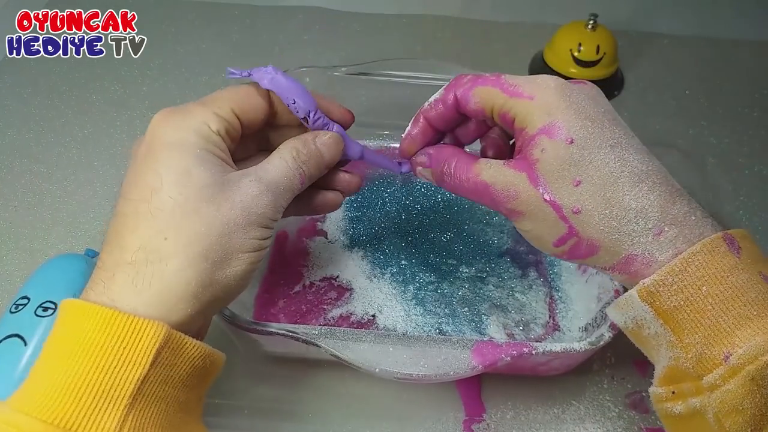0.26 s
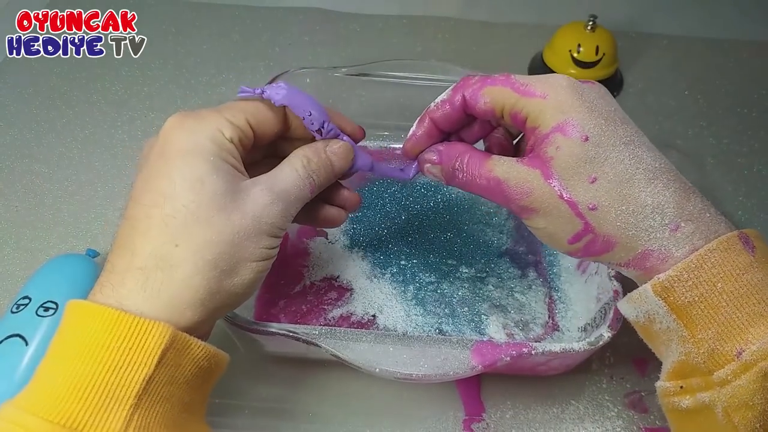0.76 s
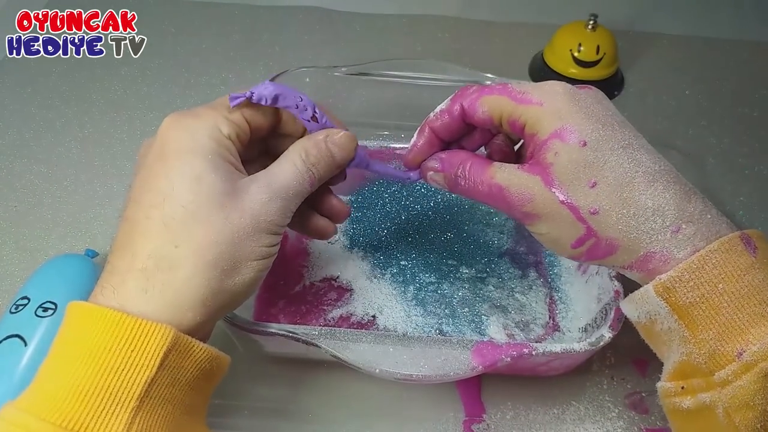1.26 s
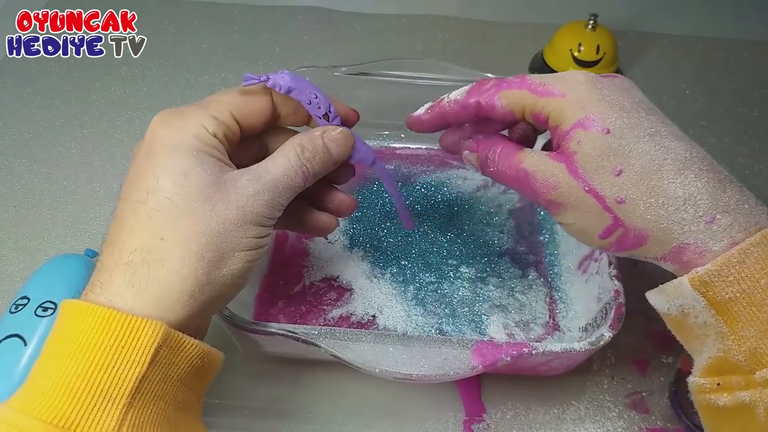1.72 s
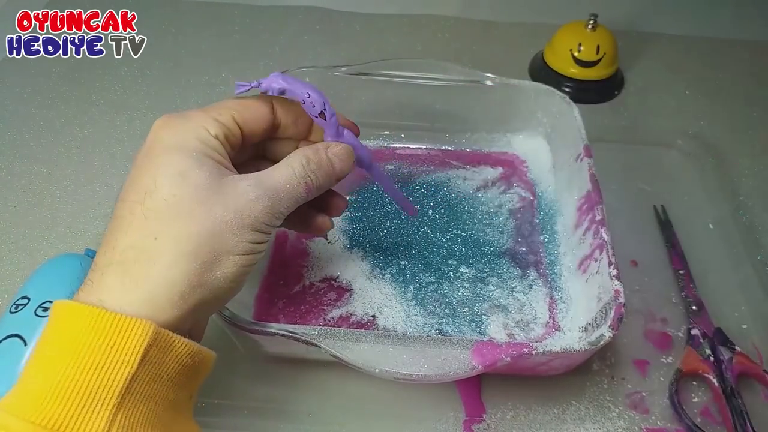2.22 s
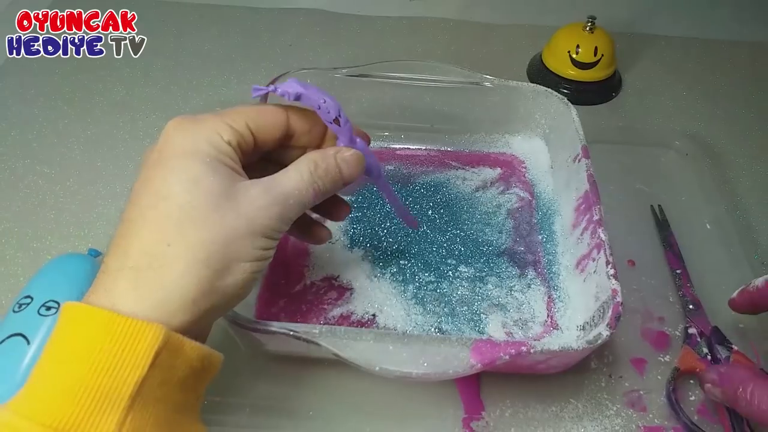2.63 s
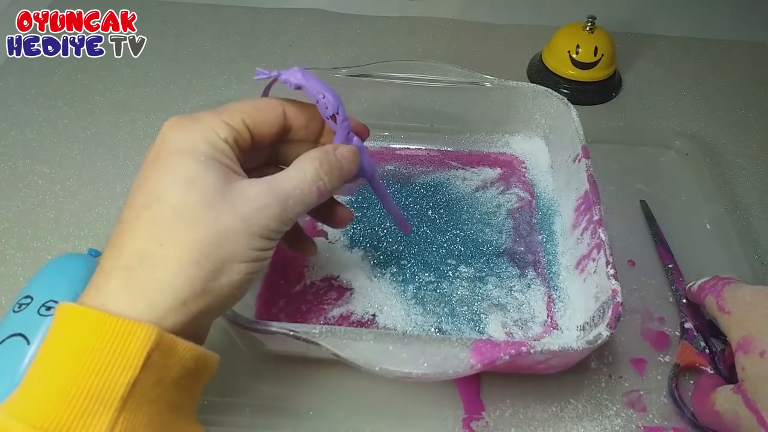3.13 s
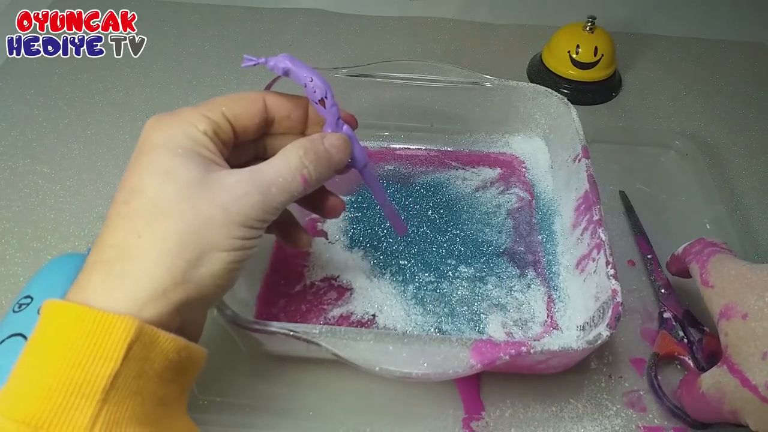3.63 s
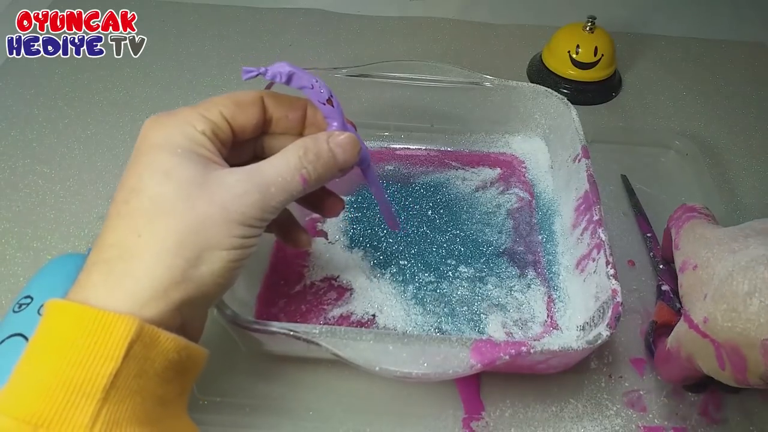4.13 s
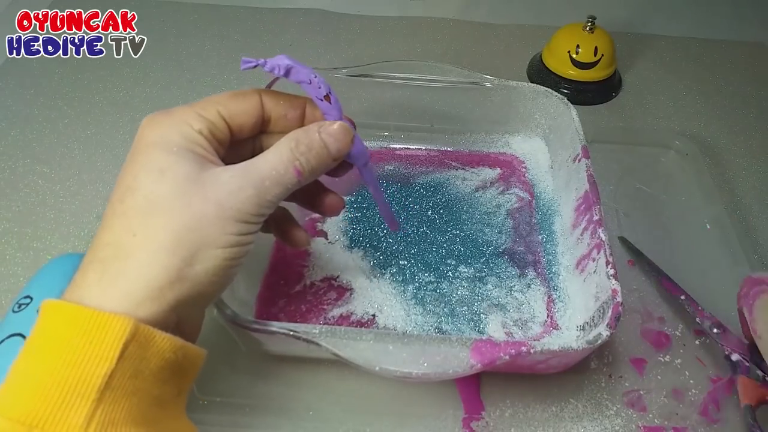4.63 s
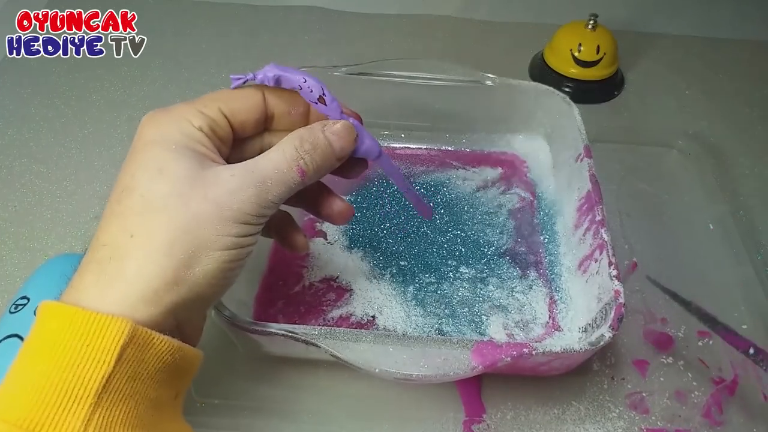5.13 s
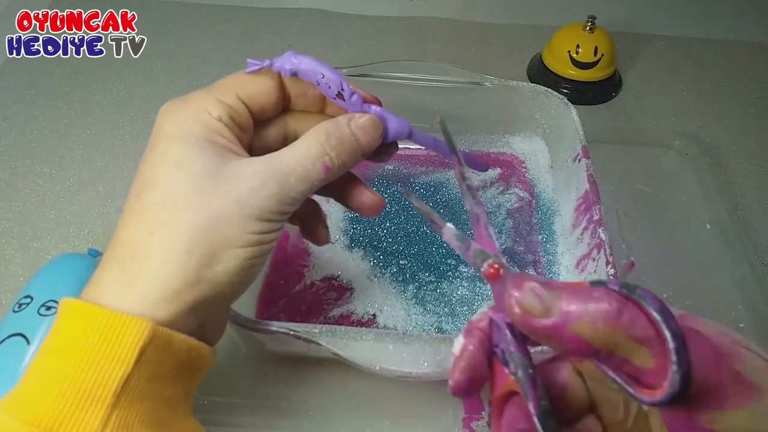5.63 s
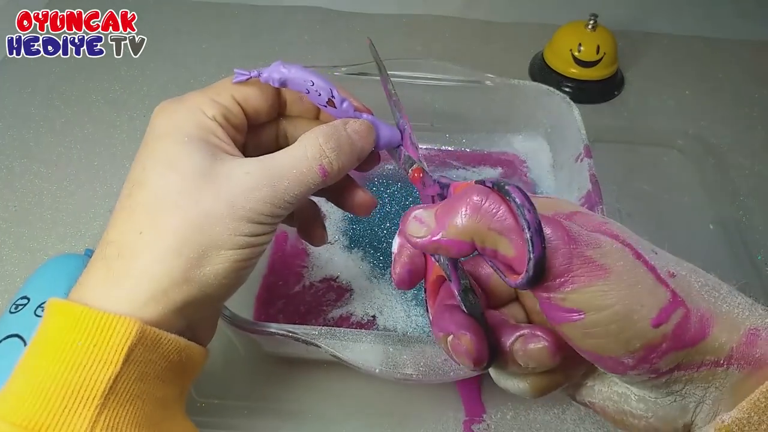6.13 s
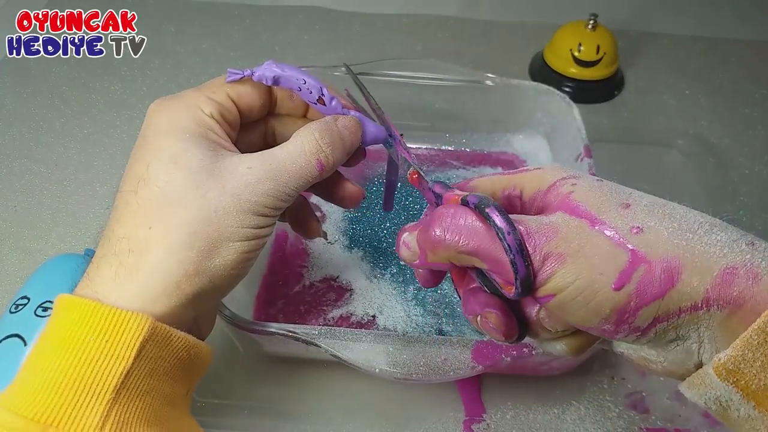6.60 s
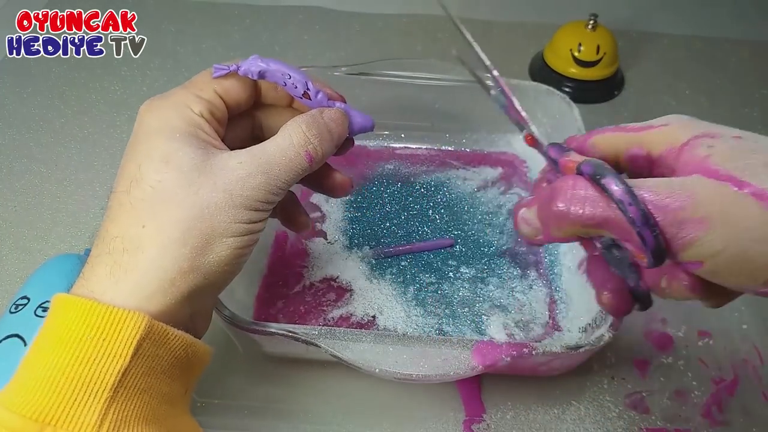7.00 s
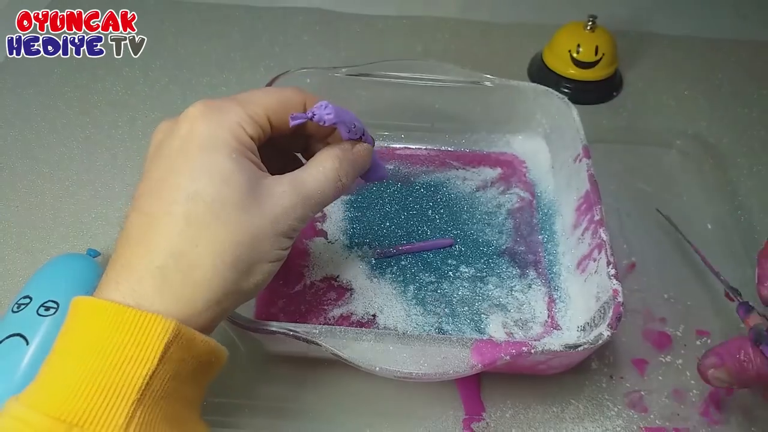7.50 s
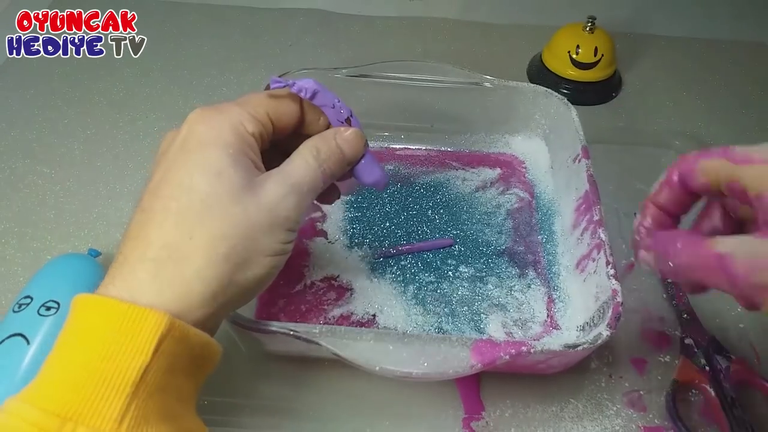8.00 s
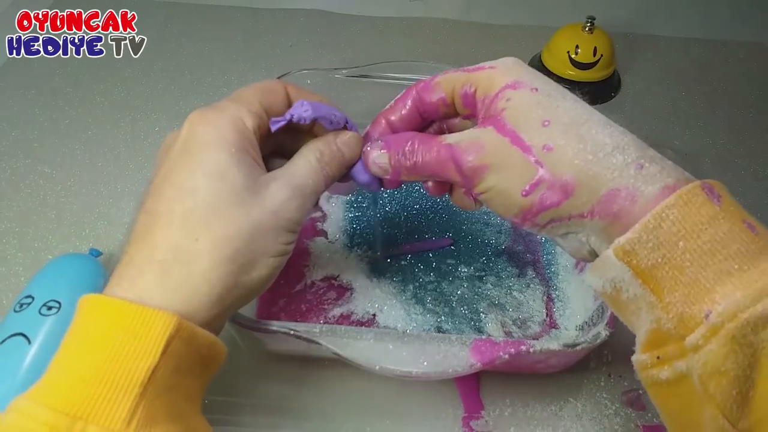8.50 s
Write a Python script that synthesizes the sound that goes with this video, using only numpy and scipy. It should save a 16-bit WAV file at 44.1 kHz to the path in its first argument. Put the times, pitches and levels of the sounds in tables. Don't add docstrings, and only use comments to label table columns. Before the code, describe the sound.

Soft rubbery strokes come first, followed by a pause and tentative woody tapping as a hand fumbles for scissors. A strong double knock marks the lift, bright steel ticks and a thin gritty snip mark the cut. After a short lull the scissors land on the table with three loud hollow clacks and small rattles. Quiet rubbing ends it. Close microphone, small room, faint steady hiss.

```python
import sys
import numpy as np
from scipy import signal
from scipy.fft import rfft, irfft
from scipy.io import wavfile

SR = 44100
rng = np.random.default_rng(int(sys.argv[2]) if len(sys.argv) > 2 else 0)


def wav_out(sig):
    wavfile.write(sys.argv[1], SR, np.round(np.clip(np.atleast_2d(sig).T, -1, 1) * 32767).astype(np.int16))


def natural_amplitude(level_db):
    exponent = np.asarray(level_db, float) / 20
    return 10 ** exponent


N = 385875

# frequency [Hz], density [dB per Hz].
SHEAR_COLOUR = [(1880, -83.5), (3200, -13), (3540, -5.5), (4570, -3), (5300, -1.5), (5750, -5.5),
                (6900, -6.5), (7780, -1.5), (8050, -3.5), (8440, -13), (9300, -12.5), (11300, -3.5),
                (16000, -8)]
# frequency [Hz], level [dB], t60 [s].
TABLE_MODES = [(75.16, -8, 0.25), (101, -2.5, 0.26), (116, 3.5, 0.3), (128, -9.5, 0.15), (216, 2, 0.092),
               (321, -1.5, 0.14), (356.5, 4.5, 0.073), (397, -6.5, 0.24), (430, -6.5, 0.021),
               (540, -9.5, 0.044), (720, 2.5, 0.014)]


def rms_one(x):
    return x / np.sqrt(np.mean(x ** 2) + 1e-20)


def butter(x, order, hz, kind="low"):
    return signal.sosfilt(signal.butter(order, hz, kind, fs=SR, output="sos"), x)


def impulse(spectrum, size=2048):
    table_hz, table_db = np.transpose(spectrum)
    hz = np.maximum(np.fft.rfftfreq(size, 1 / SR), 1)
    db = np.maximum(np.interp(np.log(hz), np.log(table_hz), table_db), -70)
    cepstrum = irfft(db * np.log(10) / 20)
    cepstrum[1:size // 2] *= 2
    cepstrum[size // 2 + 1:] = 0
    h = irfft(np.exp(rfft(cepstrum)))
    return h / np.sqrt(np.sum(h ** 2))


def ring(x, hz, t60_s):
    radius = natural_amplitude(-60 / (t60_s * SR))
    w = 2 * np.pi * hz / SR
    return signal.lfilter([0, np.sin(w)], [1, -2 * radius * np.cos(w), radius ** 2], x + 1e-18)


def friction(spectrum, per_s, spread_db, grain_db):
    height = natural_amplitude(spread_db * np.minimum(rng.exponential(1, N), 5))
    slips = height * rng.choice([-1, 1], N) * (rng.random(N) < per_s / SR)
    rough = rng.standard_normal(N) + natural_amplitude(grain_db) * rms_one(slips)
    return rms_one(signal.fftconvolve(rough, impulse(spectrum, size=8192))[:N])


def swells(rows, roundness, lifted=False):
    out = np.zeros(N)
    for s, db, rise_s, fall_s, *lift_db in rows:
        first = max(round((s - 3 * rise_s) * SR), 0)
        last = min(round((s + 3 * fall_s) * SR), N)
        i = np.arange(first, last)
        away = np.maximum((s - i / SR) / rise_s, (i / SR - s) / fall_s)
        peak_db = db + (lift_db[0] if lifted else 0)
        out[i] += natural_amplitude(peak_db - 20 * away ** roundness)
    return out


def puffs(rows, cycles, ring_s):
    size = 12000
    out, age_s = np.zeros(N), np.arange(size) / SR
    for s, db, hz, attack_s, t60_s in rows:
        noise = rng.standard_normal(size)
        burst = noise * np.minimum(age_s / attack_s, 1) * natural_amplitude(-60 * age_s / t60_s)
        puff = ring(burst, hz, ring_s + cycles / hz)
        out[round(s * SR):][:size] += natural_amplitude(db) * puff / np.abs(puff).max()
    return out


def table_top(push):
    out = 0
    for k, (hz, db, t60_s) in enumerate(TABLE_MODES):
        out = out + natural_amplitude(db) * (-1) ** k * ring(push[k], hz, t60_s)
    return butter(out, 2, 900)


def hiss():
    # frequency [Hz], density [dB per Hz].
    rumble_colour = [(15, -27.5), (25, -2.5), (104, 2.5), (201, -4), (250, -11), (359, -9), (629, -14.5),
                     (1580, -15.5), (1850, -14), (3000, -17), (3900, -43), (6600, -120)]
    preamp_colour = [(1760, -36.5), (3000, -11.5), (4120, -6), (4580, -16.5), (4680, -6.5), (5130, -2),
                     (5430, -6.5), (5740, -12), (7350, -10), (8290, -20.5), (11100, -19.5), (13100, -7),
                     (16200, -11.5)]
    # centre [Hz], width [Hz], level [dB].
    raised = [(1620, 130, -86.5), (2286, 72, -85.5), (12800, 86, -96.5), (13200, 220, -87)]
    bands = 0
    for hz, width_hz, db in raised:
        bands = bands + natural_amplitude(db) * rms_one(ring(rng.standard_normal(N), hz, 4.0 / width_hz))
    rumble = natural_amplitude(-72.5) * friction(rumble_colour, per_s=10, spread_db=1.5, grain_db=-40)
    preamp = natural_amplitude(-69) * friction(preamp_colour, per_s=8.9, spread_db=11.5, grain_db=-51.0)
    return rumble + preamp + bands


def strokes():
    # middle [s], level [dB], rise [s], fall [s].
    slides = [
        (0.0, -76, .05, 0.076),
        (.194, -67, 0.18, 0.12),
        (.47, -60.5, 0.2, 0.2),
        (.81, -59.5, 0.13, 0.15),
        (1.11, -58, 0.14, 0.15),
        (1.4, -60, 0.11, 0.094),
        (1.59, -64, 0.11, 0.17),
        (8.56, -63.5, 1, 0.12),
        (8.74, -64.5, 0.052, 0.084),
    ]
    # frequency [Hz], density [dB per Hz].
    rubber_colour = [(880, -36.5), (1500, -62), (1940, -23), (2270, -17.5), (2460, -11.5), (3120, -49.5),
                     (3350, -10), (4460, -3), (5600, -4), (8000, -2.5), (9280, -15), (12000, -5),
                     (16000, -7)]
    # frequency [Hz], t60 [s], level [dB].
    skin_modes = [(4600, 0.0041, -13), (6640, 0.02, -20), (8100, 0.03, -18)]
    slide = friction(rubber_colour, per_s=1500, spread_db=-1.0, grain_db=0.0)
    skin = sum(natural_amplitude(db) * rms_one(ring(slide, hz, t60_s)) for hz, t60_s, db in skin_modes)
    return swells(slides, roundness=2.08) * rms_one(slide + skin)


def ticks():
    # start [s], peak [dB], colour [Hz].
    snaps = [(0.1994, -52, 5370), (1.562, -58, 4480), (1.579, -42.5, 7900), (5.218, -50, 4910),
             (5.327, -44, 5000), (4.6, -43, 14000), (5.3532, -36, 5060), (5.3842, -40, 14600),
             (5.409, -36, 14100), (6.325, -51, 9800), (5.436, -29.5, 11900), (5.451, -36, 11150),
             (5.468, -47, 11630), (5.474, -33, 6700), (6.2991, -50, 9460), (6.276, -48, 11430),
             (6.343, -50, 4500), (6.632, -50, 4480), (6.654, -46.5, 12800), (6.6595, -42, 5500),
             (6.663, -36.5, 7500), (6.679, -41, 7800), (6.764, -49.5, 4520), (6.308, -49, 7040),
             (6.857, -41, 14400), (6.86, -45.5, 15100), (6.371, -44, 9500), (6.883, -48, 12800),
             (7.2715, -46, 13050), (7.284, -52, 13500), (7.2898, -35, 13500), (7.2947, -37, 12670),
             (7.3, -46, 13840), (7.306, -34, 15230), (7.311, -41, 14050), (7.314, -38, 7660),
             (7.57, -22.5, 15100), (7.59, -29.5, 15000), (7.81, -48, 8000), (7.9413, -18, 7800),
             (7.966, -31, 8000), (6.362, -38, 10970), (3.397, -41, 3500)]
    size, steel = 512, impulse(SHEAR_COLOUR)
    out, age_s = np.zeros(N), np.arange(size) / SR
    for s, db, hz in snaps:
        burst = rng.standard_normal(size) * natural_amplitude(-60 * age_s / .008)
        broad = signal.fftconvolve(burst, steel)[:size]
        snap = broad + natural_amplitude(-7.5) * ring(burst, hz, .002)
        out[round(s * SR):][:size] += natural_amplitude(db - 3.5) * snap / np.abs(snap).max()
    return butter(out, 2, 1800, "high")


def catches():
    # start [s], peak [dB], frequency [Hz], attack [s], t60 [s].
    rows = [(2.729, -52, 1200, 0.0018, 0.058), (2.74, -52, 2180, 0.0073, 0.12),
            (3.085, -47.5, 1160, .006, 0.051), (3.165, -49.5, 1060, .03, 0.066),
            (2.928, -47, 1039, 0.015, 0.091), (2.948, -41.5, 1010, .005, 0.041),
            (1.58, -57, 4470, 0.009, 0.055), (4.653, -41, 5400, .002, 0.023),
            (4.695, -50, 1600, 0.0023, 0.073), (6.269, -57, 11500, 0.0018, 0.018),
            (6.298, -49.5, 11360, .003, .02), (6.306, -50, 11230, .002, .04),
            (6.323, -52.5, 11470, 0.0019, .02), (6.358, -50.5, 5050, .003, 0.039),
            (6.37, -50, 11700, 0.0034, 0.078), (6.416, -53.5, 11600, 0.006, 0.052),
            (6.416, -55, 12800, .008, .07), (6.636, -53, 5000, .005, 0.032),
            (7.29, -49.5, 3760, 0.0035, 0.077)]
    return puffs(rows, cycles=11.0, ring_s=0.0068)


def drags():
    # peak [s], level [dB], rise [s], fall [s], grit re level [dB].
    rows = [(2.66, -67.5, 0.16, 0.2, -18), (2.85, -80.5, 0.36, 0.35, 15), (3.1, -65.5, 0.18, 0.29, 1),
            (3.42, -86.5, .2, 0.41, 22), (3.57, -63, 0.11, 0.037, -21), (4.02, -83, .15, 0.092, 20.5),
            (4.38, -72.5, 0.18, 0.14, 12), (4.5, -60, 0.11, 0.037, -1), (4.57, -69.5, 0.064, 0.22, 15),
            (4.85, -61.5, .12, .25, -4), (5.1, -62.5, 0.15, 0.21, -0.5), (7.63, -52.5, .06, 0.19, -5.5),
            (7.83, -43.5, 0.069, 0.066, -14), (7.95, -59.5, 0.092, 0.33, -2.5)]
    # frequency [Hz], density [dB per Hz].
    wood_colour = [(120, -32.5), (200, -6), (424, -22.5), (700, -10), (1130, -1), (1380, -8.5),
                   (1710, -4.5), (2710, -17.5), (4000, -12), (5200, -47.5), (8800, -120)]
    grit_colour = [(1180, -49.5), (2000, -7.5), (2220, -1), (2440, -9.5), (3230, -9), (4570, -0.5),
                   (7440, -8), (9830, -23), (13000, -20), (16000, -11)]
    wood = friction(wood_colour, per_s=2400, spread_db=2.5, grain_db=4.0) * natural_amplitude(-5.0)
    grit = friction(grit_colour, per_s=1500, spread_db=2.5, grain_db=-8) * natural_amplitude(-4)
    return swells(rows, roundness=2.0) * wood + swells(rows, roundness=1.6, lifted=True) * grit


def presses():
    # start [s], level [dB], lean to the deep modes [dB per octave].
    rows = [(2.597, -80, 7.5), (2.921, -66, 0), (2.964, -84, 8), (3.033, -69, 4.5), (3.192, -66, 4),
            (3.662, -64, -6.5), (4.022, -71, 0), (4.422, -63.5, 5), (4.466, -58.5, -0.4), (4.585, -69, 1.5),
            (4.784, -65, 0.9), (4.871, -57.5, -0.6), (4.942, -58, -0.7), (4.971, -44, 2.8),
            (4.986, -41.5, 0.7), (5.001, -40.5, 1.5), (7.57, -51, 0), (7.59, -52.5, -1.5),
            (7.648, -63, 5.5), (7.81, -55.5, -4), (7.94, -47, 0.5), (7.95, -58, 4), (7.964, -45, -2)]
    push = np.zeros((len(TABLE_MODES), N))
    octaves_down = np.log2(300 / np.array(TABLE_MODES)[:, 0])
    for s, db, lean_db in rows:
        uneven_db = 6.2 * rng.standard_normal(len(TABLE_MODES))
        push[:, round(s * SR)] += natural_amplitude(db + lean_db * octaves_down + uneven_db)
    return butter(table_top(push), 6, 66, "high")


def knocks():
    # start [s], peak [dB], ring [Hz], hardness [dB].
    gropes = [(2.598, -36.5, 1010, -14.5), (2.708, -50, 1159, -19), (2.729, -28.5, 2580, -29.5),
              (2.922, -38, 1140, -33), (2.938, -39, 1050, -38), (2.952, -41, 970, -36),
              (2.966, -25, 1085, -45), (2.977, -40, 746, -16), (3.035, -35.5, 850, -31),
              (3.194, -41, 1210, -10), (3.202, -27, 2700, -17), (3.394, -65, 1190, -7),
              (3.519, -52.5, 1300, 0), (3.608, -45, 1100, -23), (3.643, -43, 1070, -15),
              (3.663, -28, 1105, -62), (3.686, -44.5, 790, -9), (3.934, -44.5, 1130, -20),
              (3.957, -41, 1040, -48), (4.022, -28, 1080, -46), (4.106, -49.5, 1050, -21)]
    # start [s], peak [dB], ring [Hz], hardness [dB], extra rattle [dB].
    lift = [(4.376, -49, 1090, -9, 2), (4.423, -27, 1080, -33, 11), (4.463, -34, 955, -29, 8),
            (4.471, -35, 1000, -34, 9), (4.478, -36, 790, -32, -6), (4.481, -35, 890, -26, 6.5),
            (4.492, -41.5, 790, -45, 0), (4.586, -29.5, 1620, -14.5, -6.5), (4.599, -41, 1060, -2, -0.5),
            (4.694, -42.5, 1660, -21.5, -2.2), (4.783, -38.5, 1030, -27.5, 1.2),
            (4.87, -22, 1080, -13.5, -0.5), (4.874, -14, 1150, -24, 3), (4.93, -30, 1050, -28.5, 0.5),
            (4.942, -26.5, 1040, -21, 1.35), (4.954, -30.5, 1050, -20, 0.7), (4.968, -26.5, 910, -9, -5.5),
            (4.971, -25, 895, -8.5, -5), (4.986, -7, 1066, -9.5, -0.5), (5.001, -14.5, 1080, -19.5, 0.5),
            (5.05, -36, 800, -17, 5.5)]
    drop_bounces = [(7.57, -16, 1046, -9, -4), (7.573, -27, 990, -9.5, 1.5),
                    (7.589, -20.5, 1020, -9.5, -5.5), (7.602, -33.5, 960, -10.5, 1),
                    (7.647, -15, 1062, -31, 8), (7.655, -43, 1300, -13.5, -4),
                    (7.766, -37.5, 970, -34.5, -2.5), (7.771, -37, 1170, -23.5, -5),
                    (7.786, -22.5, 1100, -31.5, -10), (7.797, -30, 1000, -20, -2.5),
                    (7.81, -4.5, 1080, -16, 0), (7.824, -24.5, 1130, -14.5, -2.7),
                    (7.851, -25.5, 1170, -19.5, -0.5), (7.885, -16, 1036, -18.5, -1),
                    (7.895, -31.5, 885, -13, -1.5), (7.94, -5, 1090, -6.5, -2.5),
                    (7.951, -14.5, 1610, -26.5, -4.5), (7.957, -18.5, 1080, -24, -3.5),
                    (7.967, -21, 1060, -8, -1.5), (7.981, -27, 1110, -27, -6.5),
                    (8.001, -29, 1090, -21, -5), (8.124, -57, 1210, 8, -8)]
    # frequency [Hz], density [dB per Hz].
    crack_colour = [(880, -22.5), (1500, -3.5), (2880, -20), (3520, -6), (4370, -8), (5490, -7),
                    (6370, -11), (6960, -13), (7840, -9.5), (9650, -37), (10700, -28), (16000, -34.5)]
    wood_colour = [(320, -32.5), (550, -16.5), (850, -4.5), (1100, -1), (1500, -5), (2300, -11.5),
                   (3500, -15), (4550, -36.5), (7700, -69.5)]
    size, modes = 2048, len(TABLE_MODES)
    crack, wood = impulse(crack_colour), impulse(wood_colour)
    out, push = np.zeros(N), np.zeros((modes, N))
    click, age_s = np.eye(1, size)[0], np.arange(size) / SR
    choke = np.exp(-(age_s / 0.0032) ** 4) + natural_amplitude(-14.5 - 60 * age_s / 0.028)
    for s, db, hz, hard_db, *extra_db in gropes + lift + drop_bounces:
        i = round(s * SR)
        hollow = signal.lfilter([.04], [1, -1.6, .64], np.sin(2 * np.pi * hz * age_s) * choke)
        hollow = signal.lfilter(*signal.butter(2, hz / 2, "high", fs=SR), hollow)
        scrape = rng.standard_normal(size) * natural_amplitude(-60 * age_s / 0.026) * np.minimum(age_s / 0.00092, 1)
        rattle = signal.fftconvolve(scrape, wood)[:size]
        grains = rng.standard_normal(size) ** 3 / 4 * natural_amplitude(-60 * age_s / .014)
        chatter = signal.fftconvolve(7 * click + grains, crack)[:size]
        rattle_db = -2.5 + 0.5 * hard_db + sum(extra_db)
        out[i:i + size] += natural_amplitude(db + rattle_db) * rattle
        out[i:i + size] -= natural_amplitude(db + hard_db - 5.0) * chatter + natural_amplitude(db - 5.5) * hollow
        push[:, i] = natural_amplitude(-58.5 + 0.8 * db + 3 * rng.standard_normal(modes))
    return butter(out + table_top(push), 6, 66, "high")


def booms():
    # start [s], peak [dB], frequency [Hz], t60 [s].
    rows = [(2.975, -48, 260, .06), (3.033, -40, 400, 0.026), (4.586, -40.5, 400, 0.039),
            (3.198, -48, 390, 0.062), (4.5, -45, 320, 0.045), (4.84, -32.5, 300, 0.06),
            (4.878, -36.5, 230, 0.11), (4.872, -31, 880, 0.056), (4.945, -36, 320, 0.066),
            (4.988, -22.5, 363, 0.083), (5.0, -35, 670, 0.083), (5.045, -44, 390, .05),
            (4.986, -16, 800, 0.019), (4.97, -36.5, 200, 0.099), (7.572, -31.5, 435, .06),
            (7.811, -26.5, 510, 0.035), (7.811, -36, 228, 0.095), (7.885, -42, 460, 0.045),
            (7.941, -18.5, 465, 0.031), (7.962, -28.5, 515, 0.049), (8.015, -44.5, 490, 0.14),
            (7.94, -3, 7340, 0.0018), (7.9403, -7.5, 1900, 0.0059), (7.957, -18.5, 1000, 0.019),
            (3.686, -54, 310, 0.033), (4.023, -52, 1550, 0.03)]
    rise_cycles = .7
    out, age_s = np.zeros(N), np.arange(SR // 3) / SR
    for s, db, hz, t60_s in rows:
        gain = natural_amplitude(db - 60 * age_s / t60_s) * (1 - np.exp(-age_s * hz / rise_cycles))
        out[round(s * SR):][:len(age_s)] += gain * np.sin(2 * np.pi * hz * age_s)
    return out


def scuffs():
    # peak [s], level [dB], rise [s], fall [s].
    rows = [(3.088, -46, 0.015, 0.0076), (3.202, -40, 0.028, 0.0062), (3.24, -52.5, 0.054, 0.022),
            (3.378, -36.5, 0.0055, 0.017), (3.397, -40, 0.016, 0.037), (3.612, -44, 0.006, 0.0067),
            (3.964, -53, 0.035, 0.032), (4.48, -48, 0.11, 0.084), (4.64, -66, .01, 0.027),
            (4.696, -46.5, 0.0059, .026), (4.9, -45.5, 0.025, 0.19), (4.944, -43.5, 0.047, 0.028),
            (4.965, -35, 0.0051, .01), (7.788, -43, 0.015, 0.024)]
    # frequency [Hz], density [dB per Hz].
    colour = [(290, -72.5), (500, -42.5), (1230, -4.5), (1900, -14), (2070, -12.5), (3700, -12),
              (4150, -17.5), (4530, -8.5), (5550, -22.5), (7750, -17.5), (10500, -44), (13600, -25.5),
              (16000, -35)]
    rub = friction(colour, per_s=970, spread_db=1.5, grain_db=-4.0)
    return swells(rows, roundness=1.2) * rub * natural_amplitude(-9.0)


def clinks():
    # start [s], peak [dB], frequency [Hz], attack [s], t60 [s].
    rows = [(5.075, -45, 6840, .02, 0.073), (3.18, -52, 2760, .01, .06), (4.64, -55, 802, .02, 0.056),
            (5.47, -51, 15000, .03, 0.35), (3.605, -47.5, 5150, 0.0056, 0.039),
            (3.607, -48.5, 1150, 0.009, 0.029), (3.931, -61, 1150, 0.0024, 0.062),
            (3.953, -68, 1050, 0.0045, 0.045), (3.982, -61, 1100, .003, 0.034),
            (4.028, -44.5, 1170, 0.0035, 0.035), (4.422, -26, 1550, 0.0021, 0.025),
            (4.586, -37, 2270, 0.00059, 0.019), (4.586, -36.5, 5600, .0007, .02),
            (4.695, -56, 2600, .0015, 0.011), (4.874, -24.5, 1840, 0.0022, 0.032),
            (4.968, -23.5, 4140, .0015, 0.041), (4.986, -14.5, 3830, .0007, 0.022),
            (4.986, -15, 2887, .0007, 0.027), (7.57, -24, 2040, .0007, 0.027),
            (7.59, -35, 2200, 0.00058, 0.028), (7.646, -36.5, 3000, .0015, 0.021),
            (7.794, -39, 2600, 0.0022, 0.022), (7.809, -30, 3070, .0007, 0.05),
            (7.827, -27, 2920, .001, .025), (7.895, -35.5, 2600, .0015, 0.017),
            (7.94, -17.5, 3200, .0007, 0.0083), (7.966, -29, 3300, .0007, 0.019)]
    return puffs(rows, cycles=13.0, ring_s=0.00032)


def shears():
    # peak [s], level [dB], rise [s], fall [s], top end re level [dB].
    passes = [(5.092, -53.5, 0.099, 0.033, -7), (5.36, -53, 0.038, 0.093, -10),
              (5.45, -60.5, 0.066, 0.08, 2), (5.53, -61.5, .1, 0.49, -9), (6.104, -59, .03, 0.039, -8),
              (6.632, -59.5, 0.021, 0.055, 1.5), (6.66, -51.5, 0.0083, 0.044, -7.5),
              (6.768, -58, 0.02, 0.015, -9), (6.856, -75, 0.031, 0.074, 14.5),
              (7.26, -65, 0.022, 0.078, -11), (7.3, -57, .04, 0.025, 0.5)]
    cut = [
        (6.305, -58, 0.048, 0.089, 4.5),
        (6.361, -53, 0.054, 0.096, -1),
    ]
    # frequencies [Hz], levels [dB].
    blade_hz = [4720, 11300]
    blade_db = [-12, -19]
    slide = friction(SHEAR_COLOUR, per_s=2500, spread_db=2.0, grain_db=-8)
    judder = butter(rng.standard_normal(N), 2, [40, 160], "band")
    slide = rms_one(slide * natural_amplitude(2.0 * rms_one(judder)))
    low = rms_one(butter(slide, 6, 9300, "low"))
    top = rms_one(butter(slide, 6, 9300, "high"))
    blades = sum(natural_amplitude(db) * rms_one(ring(slide, hz, 0.006)) for hz, db in zip(blade_hz, blade_db))
    body_gain = swells(passes + cut, roundness=0.92)
    bite_gain = swells(passes + cut, roundness=0.92, lifted=True)
    return body_gain * low * natural_amplitude(-3.0) + bite_gain * top + swells(cut, roundness=1.6) * blades


def squeal():
    # time [s], frequency [Hz], level [dB].
    path = [
        (6.271, 6780, -82.5),
        (6.295, 7070, -64.5),
        (6.322, 7550, -77.5),
        (6.354, 7700, -73),
        (6.363, 7810, -47),
        (6.385, 7840, -67),
        (6.415, 8000, -71),
        (6.43, 8550, -72),
        (6.45, 8550, -76),
    ]
    s, hz, db = np.transpose(path)
    t = np.arange(N) / SR
    phase = 2 * np.pi * np.cumsum(np.interp(t, s, hz)) / SR
    wobble = butter(rng.standard_normal((2, N)), 2, 160)
    whistle = rms_one(wobble[0] * np.cos(phase) + wobble[1] * np.sin(phase))
    fade_s = .008
    fade = np.clip(np.minimum(t - s[0] + fade_s, s[-1] + fade_s - t) / fade_s, 0, 1)
    return natural_amplitude(np.interp(t, s, db)) * fade * whistle


def room(x):
    # band centre [Hz], t60 [s], level [dB].
    bands = [(87.1, 0.4, -4), (181, 0.28, 5.5), (334, 0.3, 3), (626, 0.25, 1.5), (1410, 0.17, -4.5),
             (2600, 0.25, -1), (5400, 0.3, -8), (10076, 0.12, 2.5), (13500, 0.032, -3.5)]
    age_s, tail = np.arange(SR // 2) / SR, 0
    for hz, t60_s, db in bands:
        noise = butter(rng.standard_normal(len(age_s)), 2, [hz / 2 ** .5, hz * 2 ** .5], "band")
        tail = tail + noise * natural_amplitude(db - 60 * age_s / t60_s)
    tail = tail * np.clip((age_s - .003) / 0.00021, 0, 1)
    return signal.fftconvolve(x, tail / np.sqrt(np.sum(tail ** 2)))[:N]


def scene():
    balloon = strokes() + ticks()
    handles = drags() + presses() + knocks() + booms() + scuffs()
    blades = catches() + clinks() + shears() + squeal()
    hands = butter(balloon + handles + blades, 4, 55, "high")
    return (hands + natural_amplitude(-9) * room(hands) + hiss())[None]


def band_limit(x):
    return signal.sosfilt(signal.butter(12, 16620, fs=SR, output="sos"), x)


def record(dry):
    bass_cut = signal.butter(2, 38, "high", fs=SR, output="sos")
    top_cut = signal.cheby2(14, 50, 16300, fs=SR, output="sos")
    return band_limit(signal.sosfilt(np.vstack([bass_cut, top_cut]), dry))


dry = scene()
out = record(dry)
wav_out(out)
```